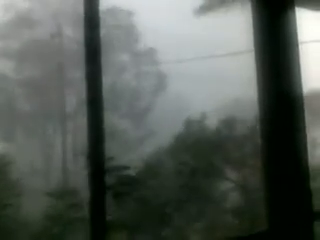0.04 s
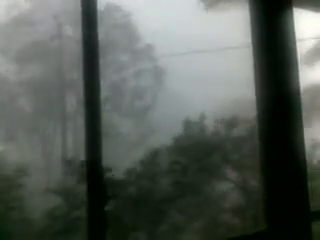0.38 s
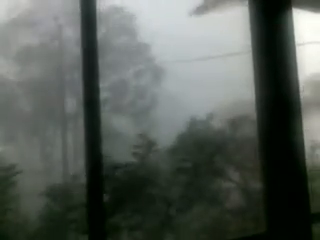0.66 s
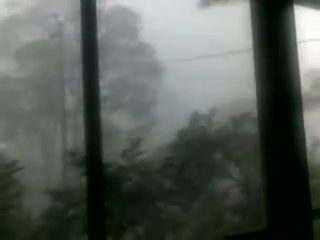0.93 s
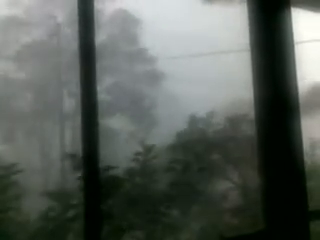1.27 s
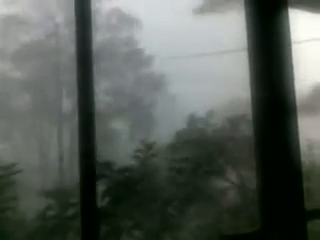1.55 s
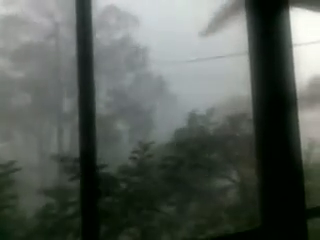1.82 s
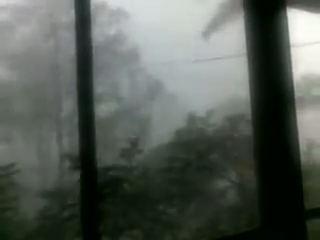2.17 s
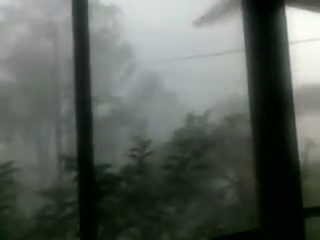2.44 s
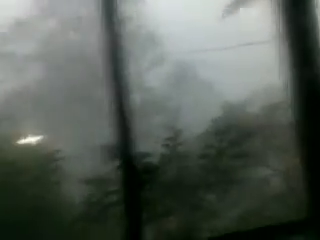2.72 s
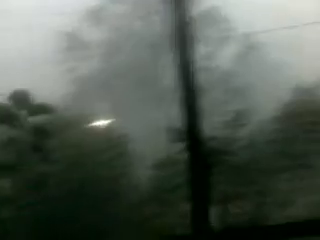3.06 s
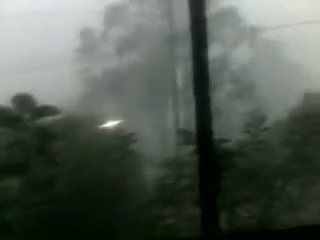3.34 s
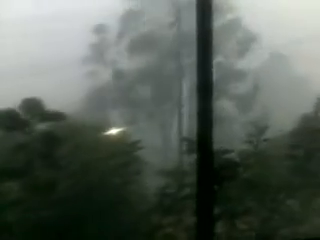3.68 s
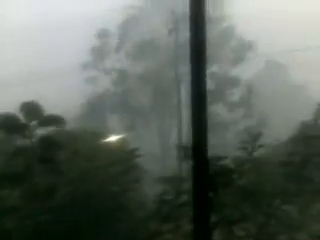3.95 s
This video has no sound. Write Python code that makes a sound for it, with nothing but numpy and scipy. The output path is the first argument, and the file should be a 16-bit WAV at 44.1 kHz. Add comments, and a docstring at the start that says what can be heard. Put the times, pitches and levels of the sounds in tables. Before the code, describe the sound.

Steady heavy rain washes over trees as wind rumbles and a handled camera knocks.

```python
"""At a house window, facing trees in heavy rain, on the microphone of a hand-held camera.
Far drops merge into a dense wash, nearer ones patter finely, and spray hisses on the leaves.
Underneath, wind rumbles: one gust howls briefly, and later low tones swell out of the rumble.
Right at the microphone the camera is bumped twice; then its case creaks in small knocks as it is turned."""
import sys
import numpy as np
from scipy import signal
from scipy.fft import rfft, irfft
from scipy.io import wavfile
from scipy.ndimage import uniform_filter1d

SR = 44100
rng = np.random.default_rng(int(sys.argv[2]) if len(sys.argv) > 2 else 0)


def unload_wav(signal):
    """Save mono or channel-first audio to the path in sys.argv[1] as 16-bit WAV at rate SR, clipped to [-1, 1]."""
    wavfile.write(
        sys.argv[1],
        SR,
        np.round(np.clip(np.atleast_2d(signal).T, -1, 1) * 32767).astype(np.int16),
    )


N = 176400


def undb(db):
    """Decibels to gain."""
    return 10 ** (np.asarray(db) / 20)


def level(x, db):
    """Sets the rms level."""
    return x * undb(db) / np.sqrt(np.mean(x ** 2))


def curve(rows):
    """Gain over time from (time [s], level [dB]) points."""
    return undb(np.interp(np.arange(N) / SR, *np.array(rows).T))


def walk(rate_hz):
    """Random values, each held for 1 / rate_hz seconds, smoothed twice; spread near 1."""
    hold = int(SR / rate_hz)
    steps = np.repeat(rng.standard_normal(N // hold + 1), hold)
    return 1.3 * uniform_filter1d(uniform_filter1d(steps, hold), hold)[:N]


def cut(x, hz, kind, order):
    """Low-pass or high-pass filter."""
    return signal.sosfilt(signal.butter(order, hz, kind, fs=SR, output="sos"), x)


def colour(x, points):
    """Filters x by a curve of (frequency [Hz], gain [dB]) points."""
    hz, db = np.array(points).T
    bin_hz = np.maximum(np.fft.rfftfreq(N, 1 / SR), 1)
    return irfft(rfft(x) * undb(np.interp(np.log(bin_hz), np.log(hz), db)), N)


def flickering(flicker_db, rate_hz):
    """Noise whose half-octave bands each waver in level on their own."""
    half_octaves = 2 * np.log2(np.maximum(np.fft.rfftfreq(N, 1 / SR), 1) / 10)
    spectrum = rfft(rng.standard_normal(N))
    bands = (irfft(spectrum * np.maximum(1 - abs(half_octaves - k), 0), N) for k in range(24))
    return sum(band * undb(flicker_db * walk(rate_hz)) for band in bands)


def rain(drops_per_s=500, drop_spread_db=3, swell_db=0.5):
    """Countless far drops merge into a wash; those nearer the window patter at random."""
    # rise and fall of the rain (time [s], gain [dB])
    rain_level = [(0, -2.5), (.25, 0.5), (.55, 0.5), (.85, 1.5), (1.0, -0.5), (1.3, -1), (1.55, 0.8),
                  (2.0, 0.85), (2.6, 2.4), (2.9, 1.7), (3.1, 0.3), (4, 1)]
    # spectrum of the far wash (frequency [Hz], gain [dB])
    wash_colour = [(150, 2.5), (250, 1.5), (450, 0.5), (700, -2), (950, -4), (1130, -1.5), (1250, -2.5),
                   (1400, 0), (1650, -3.5), (1850, -9.5), (2150, -10), (2700, -17.6), (3150, -16),
                   (4200, -24), (6000, -30.5), (14000, -38.5)]
    # spectrum of the nearer drops (frequency [Hz], gain [dB])
    patter_colour = [(400, -9), (1400, 6), (3200, -11), (6000, -25), (14000, -20.5)]
    wash = colour(flickering(flicker_db=1.21, rate_hz=18), wash_colour)
    wash *= undb(swell_db * walk(rate_hz=6.82))
    hits = (rng.random(N) < drops_per_s / SR) * np.sign(rng.standard_normal(N))
    strength = undb(drop_spread_db * np.minimum(rng.exponential(size=N), 4))
    patter = colour(hits * strength, patter_colour)
    return (level(wash, db=-44) + level(patter, db=-56)) * curve(rain_level)


def leaf_spray():
    """Spray on the leaves outside makes a fast-flickering hiss."""
    # spectrum of the spray (frequency [Hz], gain [dB])
    hiss_colour = [(1500, -8), (3200, 6.5), (5000, 3.5), (6500, 1.5), (9000, 2), (11500, -3.5),
                   (14000, -2.5)]
    # rise and fall of the hiss (time [s], gain [dB])
    hiss_level = [(0, -2.5), (.3, 0.5), (.52, 3.5), (.85, 1), (1.05, -1), (1.3, -2), (1.65, 1), (2.4, 1.5),
                  (3.0, 0.3), (3.5, -2), (4, -2)]
    hiss = colour(flickering(flicker_db=1.6, rate_hz=56), hiss_colour)
    return level(hiss, db=-62.5) * curve(hiss_level)


def wind_rumble():
    """Turbulent air rumbles, growing as the storm pushes on the house."""
    # spectrum of the wind (frequency [Hz], gain [dB])
    wind_colour = [(15, -22), (28, -4), (45, -1.5), (60, -3.5), (82, 1.5), (118, -2), (175, -5.8),
                   (300, -23), (600, -52.5)]
    # strength of the wind (time [s], gain [dB])
    wind_level = [(0, -5.5), (.7, -3), (1.3, -6), (1.85, -2.2), (2.25, -1.7), (2.8, -4), (3.1, 1.5),
                  (3.6, 2), (3.85, 2.3), (4, 3.3)]
    rumble = colour(flickering(flicker_db=2, rate_hz=10), wind_colour)
    return level(rumble, db=-40) * curve(wind_level)


def gust(peak_s=0.578, swell_s=0.087, peak_hz=610, fall_oct_per_s=4.4, width_hz=130):
    """Out in the trees one gust howls: a hollow band of noise that sinks in pitch as it passes."""
    from_peak = np.arange(N) / SR - peak_s
    hz = peak_hz * 2 ** (-fall_oct_per_s * from_peak)
    eddies = cut(rng.standard_normal((2, N)), width_hz / 2, "low", order=2)
    # shift the slow eddies up to centre on the falling pitch
    howl = np.real((eddies[0] + 1j * eddies[1]) * np.exp(2j * np.pi * np.cumsum(hz) / SR))
    return level(howl, db=-48) * np.exp(-(from_peak / swell_s) ** 2)


def case_knocks(bass_hz=507, shudder_hz=420, shudder_decay_s=0.015, scuff_hz=3430, scuff_rise_s=0.0015):
    """At the microphone, each push rings the camera case's damped modes, with a scuff and a shudder."""
    # pushes on the case; pitch and bass shift with the grip
    # (time [s], peak [dB], contact cut-off [Hz], bass gain [dB], scuff level [dB], mode pitch [ratio])
    pushes = [(.8580, -6, 960, 3, -48, 1.05), (0.863, -37, 603, -1, -50, 1),
              (0.8667, -18.5, 470, -4, -48, 1.07), (0.8715, -32, 450, -2, -64, .9),
              (1.0283, -20, 800, 5, -52, 0.95), (1.4511, -29, 3000, 1, -61, 0.96),
              (2.007, -23.5, 1250, 6, -55, 0.95), (2.2627, -24.5, 2400, 10, -55, 0.97),
              (2.3039, -23.5, 2900, 5, -62, 1.03), (2.49, -21.5, 3200, 1, -56, 1),
              (2.5967, -23, 1900, 6.5, -64, 1.15), (2.6122, -25.5, 730, -1, -60, 0.86),
              (2.6344, -22.5, 1200, 0, -54, 0.93), (2.6495, -28.5, 900, 9, -63, 0.85),
              (2.7446, -20.5, 1150, 1, -62, 0.91), (2.8945, -19, 1160, -22, -55, 0.96)]
    # modes of the case (frequency [Hz], time to fall 60 dB [s], relative level [dB])
    case_modes = [(86, 0.022, -12.5), (247, 0.012, -2), (396, 0.012, -2), (718, 0.011, 1),
                  (943, 0.0091, 1.5), (1390, 0.0026, 4.5), (1950, 0.0046, 1), (2860, .004, -8.5)]
    t, out = np.arange(SR // 10) / SR, np.zeros(N + SR)
    scuff_band = signal.iirpeak(scuff_hz, Q=1 / 0.48, fs=SR)
    scuff_envelope = t / scuff_rise_s * np.exp(1 - t / scuff_rise_s)
    for start, peak_db, contact_hz, bass_db, scuff_db, pitch in pushes:
        ring = 0
        for k, (hz, t60, mode_db) in enumerate(case_modes):
            decay = np.exp(-np.log(1000) * t / t60)
            ring += (-1) ** k * undb(mode_db) * np.sin(2 * np.pi * hz * pitch * t) * decay
        bass = cut(cut(ring, bass_hz, "low", order=2), bass_hz, "low", order=2)
        upper = cut(cut(ring, bass_hz, "high", order=2), bass_hz, "high", order=2)
        # a softer contact leaves out the high modes
        knock = cut(undb(bass_db) * bass + upper, contact_hz, "low", order=6)
        shudder = cut(rng.standard_normal(len(t)), shudder_hz, "low", order=2)
        body = knock / abs(knock).max() + level(shudder, db=-26) * np.exp(-t / shudder_decay_s)
        scuff = signal.lfilter(*scuff_band, rng.standard_normal(len(t)))
        i = int(start * SR)
        out[i:i + len(t)] += undb(peak_db) * body + level(scuff, scuff_db) * scuff_envelope
    return out[:N]


def wind_drones(waver_hz=2, waver_db=0.92, fade_s=0.052):
    """Low wavering tones rise out of the wind, glide and sink back."""
    # tones of the wind (start [s], end [s], starting pitch [Hz], glide [Hz/s], level between fades [dB])
    drones = [(2.68, 3.047, 46.4, 0.5, -41), (3.01, 3.121, 109.6, 0, -34.5), (3.109, 3.30, 109.4, 10, -41),
              (3.37, 3.733, 84, -130, -43.5), (3.689, 3.827, 109.8, -190, -37.5),
              (3.802, 3.93, 99.6, 20.5, -40)]
    t, out = np.arange(N) / SR, np.zeros(N)
    for start, end, start_hz, glide, db in drones:
        hz = start_hz + glide * (t - start) + waver_hz * walk(rate_hz=39.9)
        tone = np.sin(2 * np.pi * np.cumsum(hz) / SR) * undb(waver_db * walk(rate_hz=18))
        fade = np.clip(np.minimum(t - start, end - t) / fade_s, 0, 1)
        out += level(tone, db) * fade
    return out


def scene():
    """Rain and wind beyond the window, handling right at the microphone; one channel."""
    outside = rain() + leaf_spray() + wind_rumble() + gust() + wind_drones()
    return (outside + case_knocks())[None]


def record(dry):
    """The camera cuts the treble steeply above 14.4 kHz."""
    return signal.sosfilt(signal.ellip(10, .2, 70, 14400, fs=SR, output="sos"), dry)


dry = scene()
out = record(dry)
unload_wav(out)
```